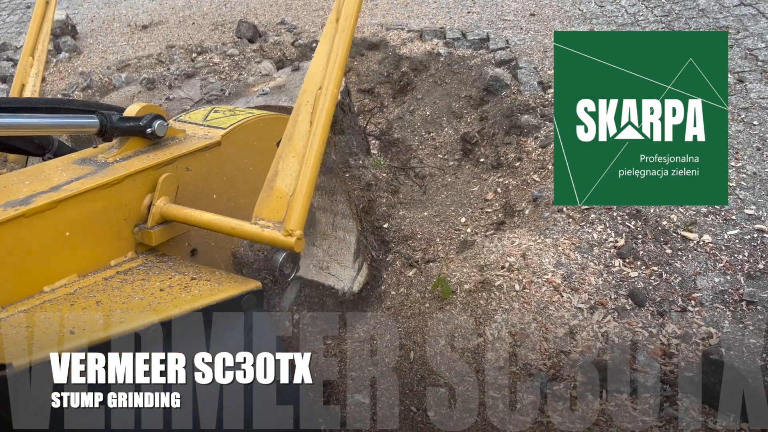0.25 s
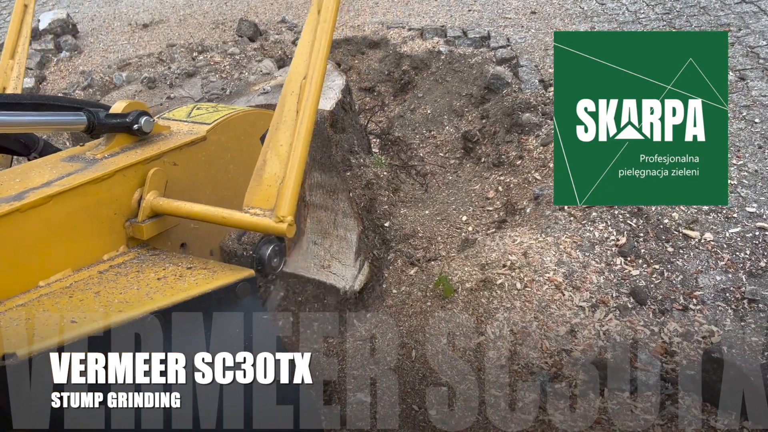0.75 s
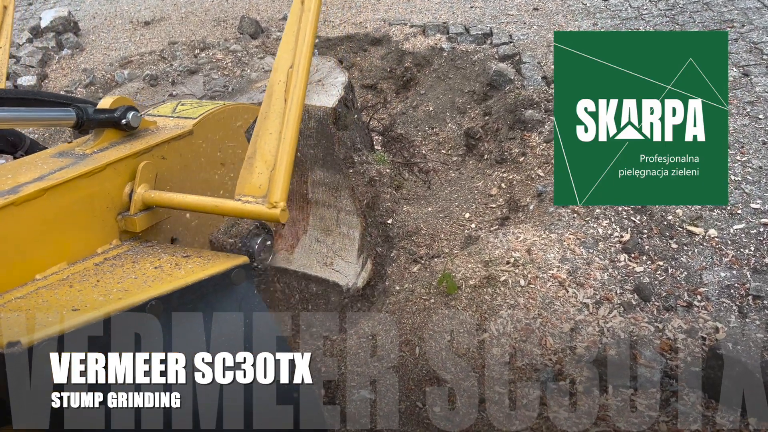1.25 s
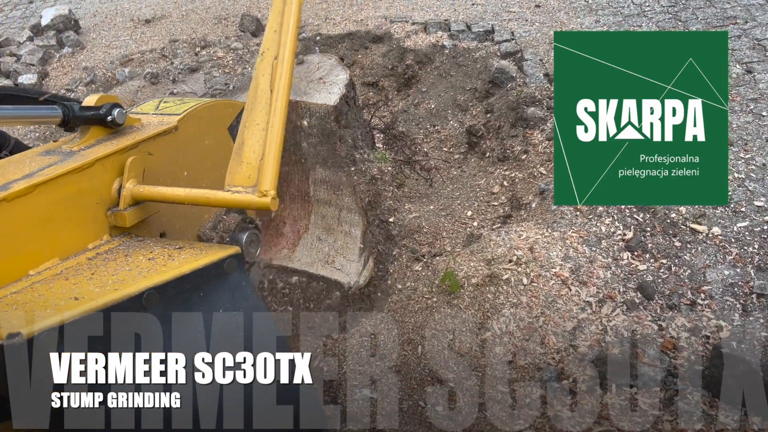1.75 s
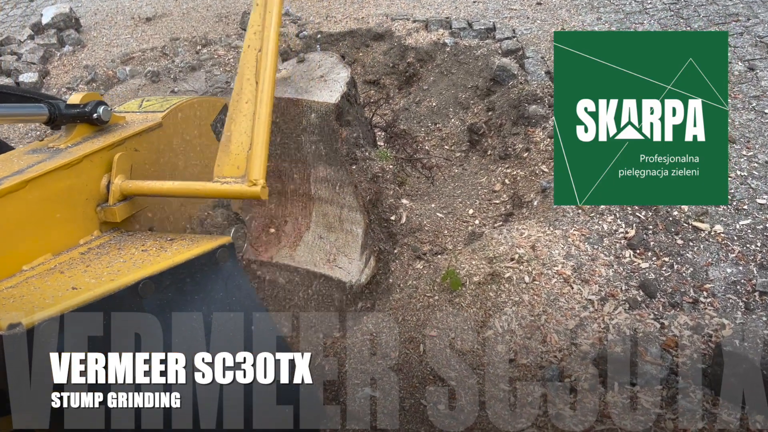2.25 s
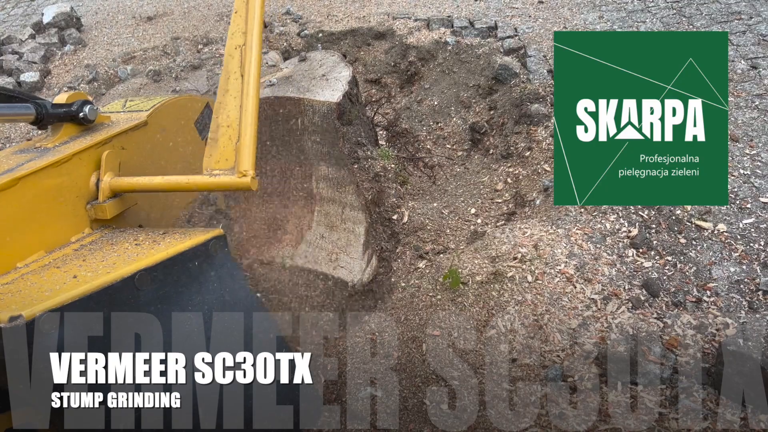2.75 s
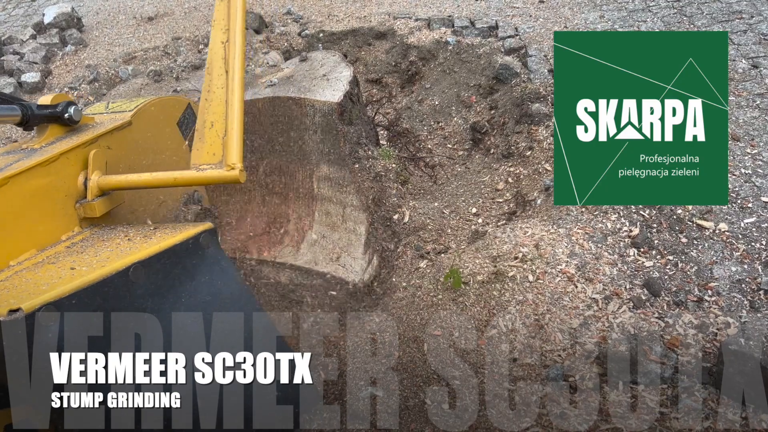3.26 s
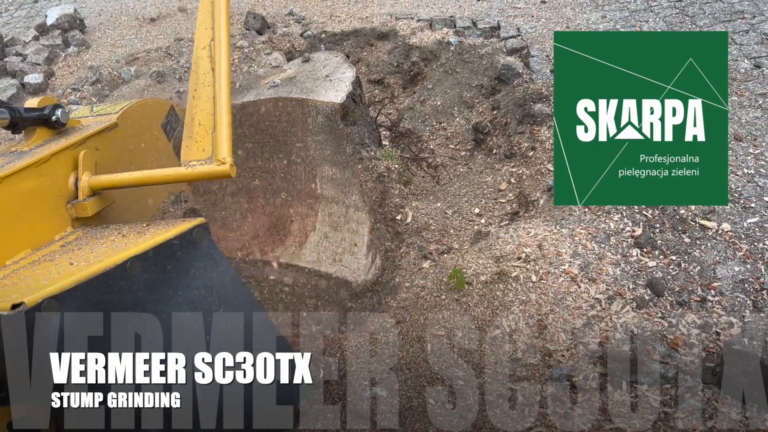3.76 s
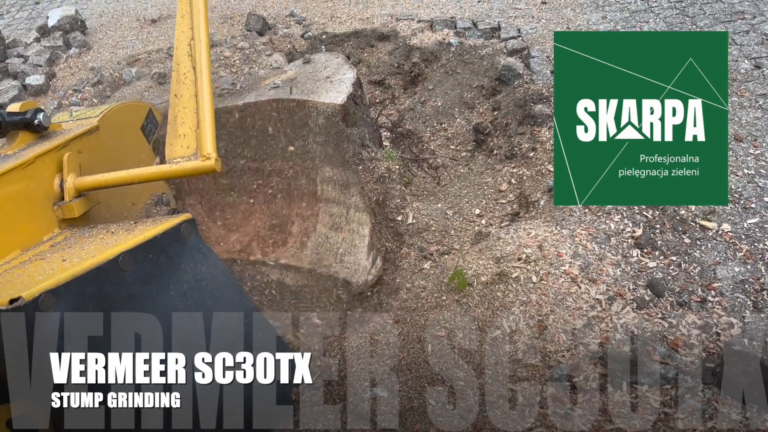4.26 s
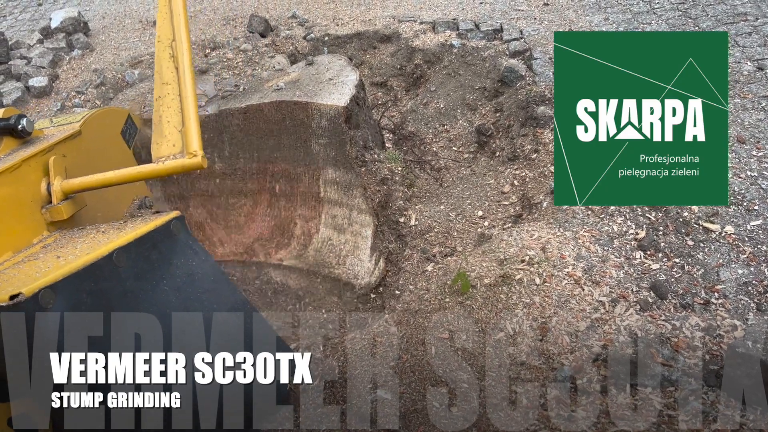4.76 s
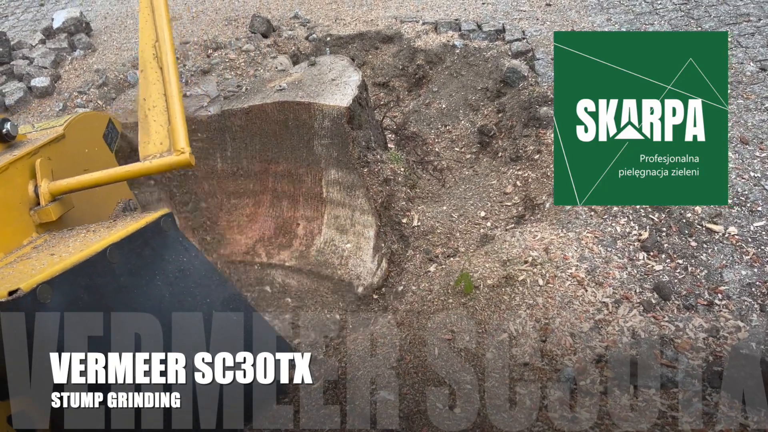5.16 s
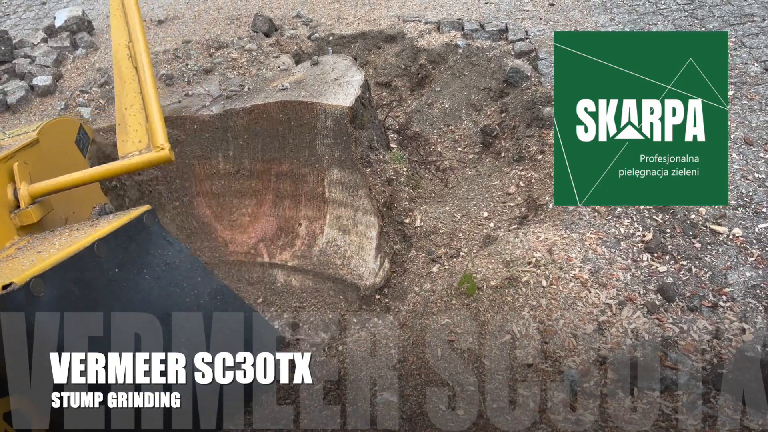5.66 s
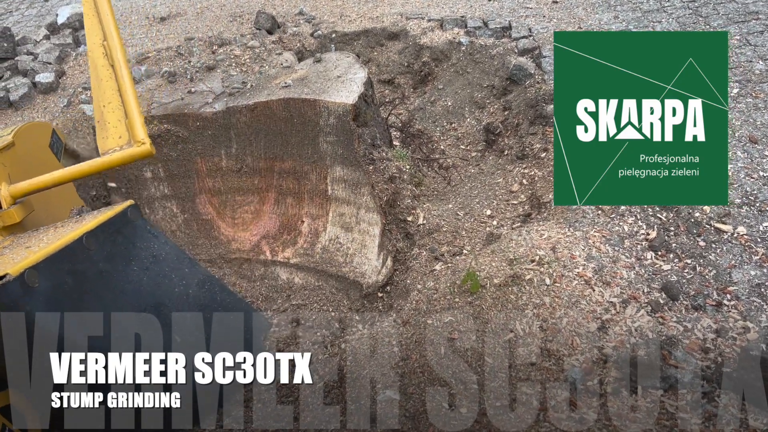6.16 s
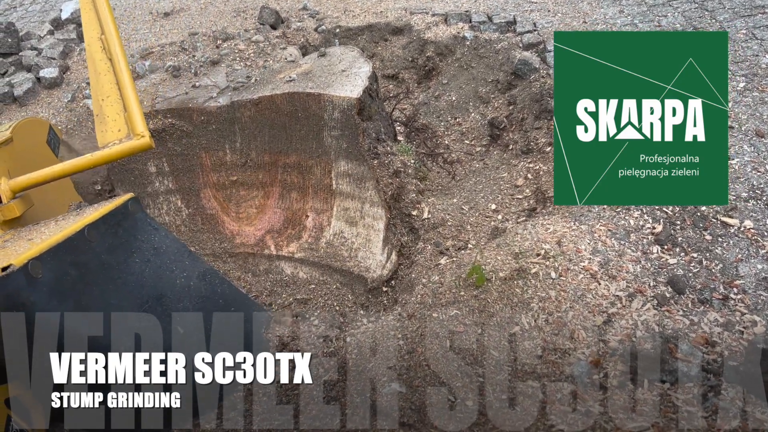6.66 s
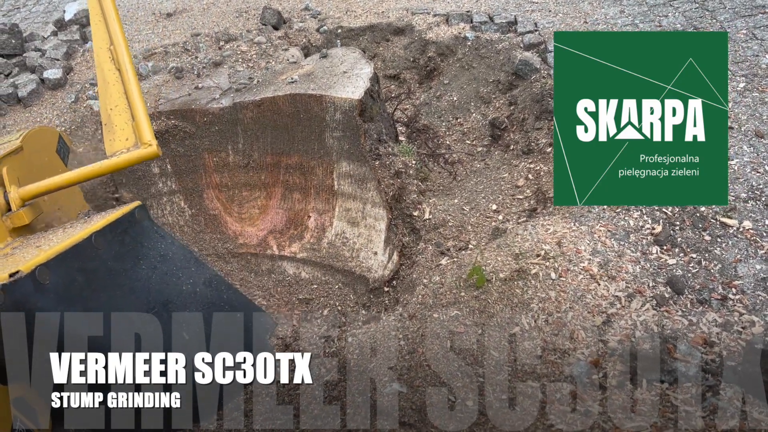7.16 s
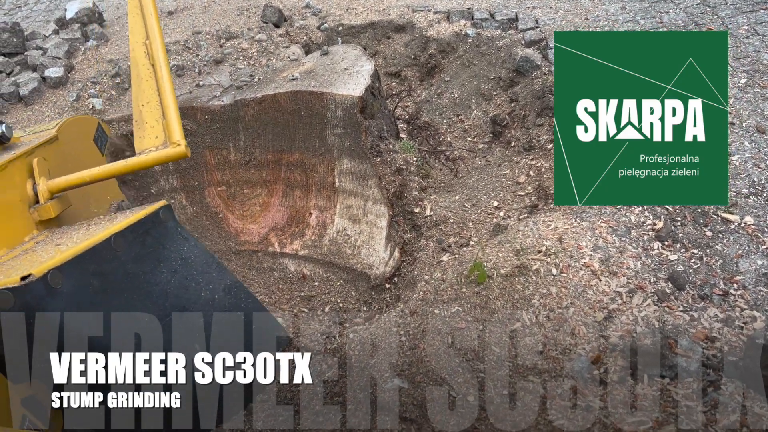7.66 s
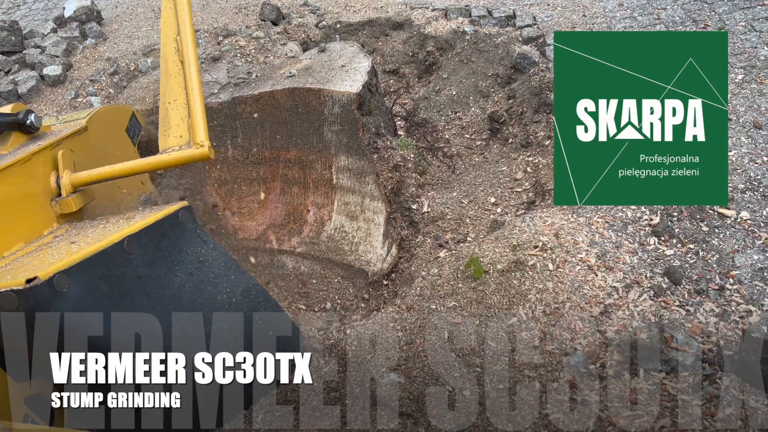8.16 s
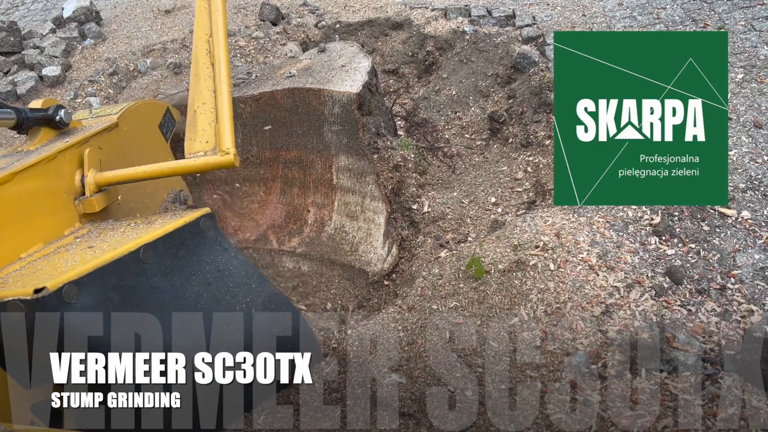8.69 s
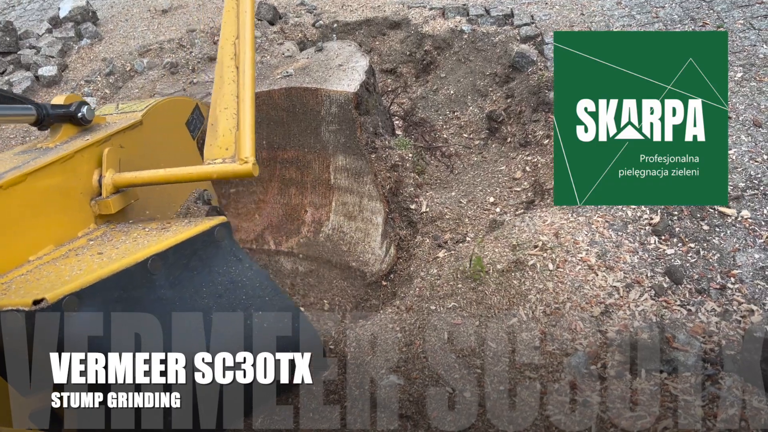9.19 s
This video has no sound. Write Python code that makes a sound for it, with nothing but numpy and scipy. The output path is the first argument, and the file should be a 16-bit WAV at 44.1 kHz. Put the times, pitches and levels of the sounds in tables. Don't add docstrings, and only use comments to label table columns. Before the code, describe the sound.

Close by, a loaded twin-cylinder engine drones and whines while cutting teeth roar into a stump, loose metal clatters and chips tick against guards.

```python
import sys
import numpy as np
from scipy import signal
from scipy.fft import rfft, irfft, next_fast_len
from scipy.io import wavfile
from scipy.ndimage import uniform_filter1d

SR = 44100
rng = np.random.default_rng(int(sys.argv[2]) if len(sys.argv) > 2 else 0)


def elevation(decibels):
    levels = np.asarray(decibels, float)
    return 10 ** (levels / 20)


def persist_wave(psi):
    counts = np.round(np.clip(psi, -1, 1) * 32767).astype(np.int16)
    wavfile.write(sys.argv[1], SR, np.atleast_2d(counts).T)


N = 415863
T = np.arange(N) / SR


def unit(x):
    return x / np.sqrt(np.mean(x ** 2))


def noise():
    return rng.standard_normal(N)


def curve(table):
    return np.interp(T, *np.transpose(table))


def pitch_curve(hz, table):
    at, value = np.transpose(table)
    return np.interp(np.log(hz), np.log(at), value)


def ring(x, hz, width):
    return signal.lfilter(*signal.iirpeak(hz, hz / width, SR), x)


def broad(x, hz, width):
    return ring(ring(x, hz, width), hz, width)


def body(x, modes):
    return sum(elevation(db) * ring(x, hz, width) for hz, width, db in modes)


def walk(rate):
    levels = rng.standard_normal(int(N / SR * rate) + 4)
    eighths = np.arange(0, len(levels), 1 / 8)
    fine = uniform_filter1d(np.interp(eighths, np.arange(len(levels)), levels), size=8)
    return 1.4 * np.interp(T * rate * 8, np.arange(len(fine)), fine)


def spell(start, end, fade):
    return np.clip(np.minimum(T - start, end - T) / fade + 1, 0, 1) ** 2


def strikes(turns, jitter_ms, scatter_db):
    at = np.flatnonzero(np.diff(np.floor(turns)) > 0)
    chance = rng.standard_normal((len(at), 2))
    shift = (chance[:, 0] * jitter_ms * SR / 1000).astype(int)
    out = np.zeros(N)
    out[np.clip(at + shift, 0, N - 1)] = elevation(scatter_db * chance[:, 1])
    return out


# (frequency [Hz], phase [rad])
PORT_LAG = [(0, 0), (200, .9), (700, 2), (1600, 3.3), (2200, 6.1), (3900, 9.2), (4600, 13.3), (7000, 18.8),
            (8600, 17.4), (9100, 15.7), (10800, 15.7), (12500, 12.6), (14700, 12.4), (15400, 9.7)]
# (frequency [Hz], level [dB])
PORT_DB = [(60, 1), (135, 2), (165, -.5), (220, 9), (300, 4), (360, 2.5), (700, 5.5), (1200, 3), (1900, 0),
           (3300, 3.5), (5600, 7), (7300, 1.5), (10000, 0)]
# (frequency [Hz], share [0-1])
PORT_ALIKE = [(60, .99), (250, .9), (380, .45), (600, .8), (1500, .75), (2800, .6), (4000, .2), (6500, .15),
              (8500, .5), (9200, .86), (10600, .9), (11600, .6), (12700, .93), (15200, .6)]


def ports(x, alike=None):
    size = next_fast_len(N)
    hz = np.maximum(np.arange(size // 2 + 1) * SR / size, 1)
    right = rfft(x, size)
    if alike is not None:
        share = np.clip(pitch_curve(hz, PORT_ALIKE), 0, 1)
        right = share * right + np.sqrt(1 - share ** 2) * rfft(alike, size)
    lag = np.interp(hz, *np.transpose(PORT_LAG))
    right = right * elevation(-pitch_curve(hz, PORT_DB)) * np.exp(-1j * lag)
    return np.array([x, irfft(right, size)[:N]])


# (frequency [Hz], width [Hz], level [dB], pipe lag [ms])
SILENCER = [(74, 18, -3.8, 3.35), (139, 40, 0, .15), (222.7, 39.4, -3.2, 1.31), (280, 15, -9, .93),
            (740, 200, -17, 0)]
FIRING_TURNS = (.3, .66)
CRANK_TURNS, VALVE_TURNS = .445, .37


def engine(cycle, effort_db):
    firings = sum(elevation(db) * strikes(cycle - turn, .08, .9) for turn, db in zip(FIRING_TURNS, (0, 1.3)))
    push = -signal.lfilter(np.hanning(30), 1, firings)
    chambers = []
    for hz, width, db, lag_ms in SILENCER:
        chambers.append(elevation(db) * np.roll(ring(push, hz, width), round(lag_ms * SR / 1000)))
    load = np.minimum(effort_db - np.median(effort_db), 0)
    deep = sum(chambers[:2]) * elevation(1.1 * load)
    exhaust = ring(deep + sum(chambers[2:]), 190, 420)
    crank = np.sqrt(2) * np.cos(4 * np.pi * (cycle - CRANK_TURNS)) * elevation(-29.3 + .3 * walk(5))
    rocking = np.cos(2 * np.pi * (cycle - .16)) * elevation(-52)
    valve_turns = 2 * (cycle - VALVE_TURNS)
    clacks = strikes(valve_turns, .03, 1.5) + .45 * strikes(valve_turns - .5, .03, 1.5)
    valves = broad(clacks, 1000, 1300)
    return unit(exhaust) * elevation(effort_db + 1.5) + crank + rocking + unit(valves) * elevation(-41.5)


PUMP_TEETH = 11
# (multiple of tooth rate, floor [dB], swell [dB], resonant speed [rpm], width [rpm])
PUMP_LINES = [(3, -56, 12, 3440, 70), (4, -56, 11, 3322, 34), (8, -60, 10, 3440, 110),
              (13, -49.5, -5.5, 3310, 60), (18, -62, 10, 3330, 130), (6, -58, 0, 3300, 99)]


def pump(cycle, rpm):
    tremble = np.cumsum(walk(40)) * 2 * np.pi * 1.5 / SR
    tooth = 2 * np.pi * 2 * PUMP_TEETH * cycle + tremble
    whine = elevation(-39.5) * np.sin(tooth) + elevation(-44) * np.sin(2 * tooth)
    levels = [db + swell_db * np.exp(-((rpm - at) / width) ** 2) for _, db, swell_db, at, width in PUMP_LINES]
    for (multiple, *_), db in zip(PUMP_LINES, levels):
        line_db = db + 9 - multiple / 6 + 2.5 * walk(12)
        whine = whine + elevation(line_db) * np.sin(multiple * tooth)
    blades = np.sin(2 * np.pi * 72 * cycle)
    return whine + blades * elevation(levels[1] + 4 + 2 * walk(4))


# (frequency [Hz], level per hertz [dB])
ROAR = [(40, -67), (100, -63), (260, -59), (500, -61), (650, -55), (1100, -55.5), (1550, -60),
        (2700, -64.8), (3900, -69), (5000, -69.5), (7000, -74), (8200, -73), (10000, -78), (15500, -81.5)]


def roar(cycle, effort_db, roar_db, hiss_db):
    throb = 0.87 * np.cos(2 * np.pi * (cycle - .33)) + 1.2 * np.cos(4 * np.pi * (cycle - .35))
    load, low, high = (c - c.mean() for c in (effort_db, roar_db, hiss_db))
    high = high + 0.67 * throb + .5 * walk(15)
    pair = np.zeros((2, N))
    for hz in 25 * 2 ** np.arange(0, 9.5, .4):
        bass = np.clip(np.log2(400 / hz), 0, 1) * (hz > 70)
        treble = np.clip(np.log2(hz / 1200) / 1.5, 0, 1)
        db = pitch_curve(hz, ROAR) + 10 * np.log10(hz * 0.28)
        db = db + bass * .5 * load + (1 - bass - treble) * low + treble * high + .7 * walk(14)
        edges = (hz * 2 ** -.2, hz * 2 ** .2)
        bandpass = signal.butter(2, edges, "bandpass", fs=SR, output="sos")
        band = signal.sosfilt(bandpass, rng.standard_normal((2, N)))
        pair += band * (elevation(db + 1.57) / band.std())
    return ports(pair[0], alike=pair[1])


# (frequency [Hz], width [Hz], level [dB])
PANELS = [(608, 22, -42), (858, 26, -37), (1645, 18, -42), (2209, 30, -39), (3081, 30, -50),
          (3300, 40, -53)]
# (frequency [Hz], width [Hz])
GUARDS = [(360, 40), (1045, 30), (5750, 14), (6350, 20), (8312, 20)]
GUARD_REST_DB = (-48, -46.5, -50, -58, -83)
# (guard index, start [s], end [s], level [dB])
SINGING = [
    (0, -1, 4.6, -40),
    (0, 8.6, 10, -42),
    (2, 0, 3.0, -55),
    (2, 3.0, 5.7, -51),
    (2, 5.8, 7.7, -55),
    (3, 5.3, 6.0, -57),
    (4, 3.2, 5.4, -52),
]
GUARD_FADE_S, FREE_GUARD_DB = 0.42, -39


def guards(free):
    steady = sum(unit(ring(noise(), hz, width)) * elevation(db + 2.5 * walk(1.5)) for hz, width, db in PANELS)
    gains = [elevation(db) + np.zeros(N) for db in GUARD_REST_DB]
    for guard, start, end, db in SINGING:
        gains[guard] += elevation(db) * spell(start, end, GUARD_FADE_S)
    gains[1] += free * elevation(FREE_GUARD_DB)
    notes = [unit(ring(noise(), hz, width)) * gain * elevation(4) for (hz, width), gain in zip(GUARDS, gains)]
    ahead = sum(notes[:2]) * elevation([[-3], [-4.5]])
    return ports(steady + sum(notes[2:])) + ahead


# (frequency [Hz], width [Hz], level [dB])
PLATE = [(2209, 26, 0), (2168, 40, -6), (2120, 70, -15), (2370, 90, -16)]
# (time [s], level [dB])
RATTLE = [(0.0, -31), (0.37, -36), (0.52, -29), (1.02, -33.5), (1.15, -27), (1.73, -38), (1.94, -30),
          (2.31, -39.5), (2.41, -25), (2.47, -34.5), (3.89, -32.5), (5.8, -30.5), (6.01, -35),
          (8.06, -33.5), (9.14, -28.5), (9.43, -33.5)]
# (time [s], peak level [dB])
KNOCKS = [(0.0837, -18), (0.156, -17.5), (0.3401, -20), (0.7407, -16.5), (0.8131, -15.5), (1.1034, -17.5),
          (1.3563, -16), (1.931, -19), (1.9699, -19), (2.4029, -15.5), (2.8729, -19.5), (3.2375, -17),
          (3.3837, -16.5), (4.339, -19.5), (4.4872, -18), (4.5615, -20), (4.5979, -18.5), (4.8214, -23),
          (4.8589, -19), (5.0444, -17), (5.7024, -17), (5.8441, -20), (6.2282, -19), (6.4378, -18),
          (8.2935, -16), (8.3674, -17.5), (8.6627, -16), (8.8099, -14.5), (8.957, -17), (9.213, -16)]
PLATE_TURNS = .24


def plate(cycle):
    knock = strikes(cycle - PLATE_TURNS, .6, 2.4) * elevation(10.5 + curve(RATTLE))
    at = np.flatnonzero(knock)
    for s, db in KNOCKS:
        knock[at[np.argmin(abs(at - s * SR))]] = 0
        knock[int(s * SR)] = elevation(db + 2.0)
    period = SR / PLATE[0][0]
    bounce = .8 * np.roll(knock, round(4 * period)) + .5 * np.roll(knock, round(9 * period))
    late = elevation(-29) * strikes(cycle - PLATE_TURNS - .4, 2.5, 4)
    peak = abs(body(signal.unit_impulse(SR), PLATE)).max()
    return body(knock + bounce + late, PLATE) / peak * elevation(-2.5)


# (time [s], peak level [dB], ring frequency [Hz], crack level [dB])
CHIPS = [(0.387, -22, 5360, -17), (0.5187, -16, 5300, -19), (1.065, -17, 5240, -30),
         (1.4411, -29, 4930, -11), (1.71, -17, 4920, -25), (1.8642, -31, 7180, -14),
         (2.2932, -38, 5770, -29), (2.4947, -27, 7480, -6), (2.573, -13.5, 4280, -26),
         (2.6199, -28, 4950, -19), (3.0345, -18.5, 4640, -20), (3.5074, -29, 4520, -11),
         (3.5997, -26, 4510, -19), (4.4483, -32, 5750, -8), (4.574, -30, 7220, -12),
         (4.7037, -20, 5260, -20), (4.9276, -25, 4430, -14), (5.3817, -29, 5740, -15),
         (5.4136, -34, 4210, -14), (5.9495, -12.5, 5800, -26), (6.3033, -20, 5000, -17),
         (7.0544, -21, 4440, -27), (7.112, -16, 4930, -34), (7.419, -17, 5370, -17),
         (9.227, -19, 4740, -17), (9.3606, -30, 4690, -15), (9.416, -18.5, 4450, -20)]


def chips():
    out = np.zeros(N + SR)
    s = np.arange(int(.03 * SR)) / SR
    envelope = (1 - np.exp(-s / .0005)) * np.exp(-s / .0045)
    small = []
    for when, size, pitch in rng.random((250, 3)):
        small.append((when * N / SR, -36 + 3.5 * -np.log(size + .03), 3000 * 2 ** (1.1 * pitch), -14))
    for at, db, hz, crack_db in list(CHIPS) + small:
        burst = rng.standard_normal(len(s)) * envelope
        ping = ring(burst, hz, hz * .1)
        crack = broad(burst, 5800, 7000)
        hit = ping / abs(ping).max() + elevation(crack_db + 18.0) * crack / abs(crack).max()
        i = int(at * SR)
        out[i:i + len(s)] += elevation(db + 2.0) * hit
    return out[:N]


# (start [s], end [s], level [dB])
THUDS = [
    (2.9, 3.0, -40),
    (3.25, 3.75, -45),
    (4.15, 4.55, -37),
    (4.65, 5.103, -39),
    (5.35, 5.41, -32),
    (8.5, 9.5, -48),
]
THUD_FADE_S, THUD_REST_DB = 0.058, -52


def thuds():
    gain = elevation(THUD_REST_DB) + sum(elevation(db) * spell(start, end, THUD_FADE_S) for start, end, db in THUDS)
    surge = elevation(np.clip(4 * walk(14), -12, 5))
    return unit(broad(noise(), 78, 70) * surge) * gain * elevation(1)


# (time [s], speed [rpm])
SHAFT = [(0.0, 3260.2), (0.47, 3294.7), (1.64, 3334.4), (2.47, 3316.9), (4.15, 3255.0), (4.86, 3210.0),
         (4.97, 3244.5), (5.53, 3283.7), (5.74, 3385.8), (6.11, 3456.2), (6.28, 3449.2), (6.64, 3320.9),
         (6.82, 3443.3), (7.48, 3425.0), (8.22, 3225.6), (8.62, 3223.0), (8.83, 3266.3), (9.43, 3294.2)]
# (time [s], level [dB])
BITE = [(0, 2), (.9, 3), (1.7, 2.5), (2.5, 3.5), (3.2, 1.5), (4.7, 1), (5.8, 2.5), (6.6, 0.5), (7.05, 3),
        (7.7, 1), (8.6, 2), (9.2, 3.5), (9.43, 4.5)]
LOADED_RPM, EASING_RPM, FREE_RPM = 3230, 3335, 3430
EXHAUST_DB, DROOP_DB_PER_100_RPM, FREE_EXHAUST_DB = -24, -1.45, -4.5
FREE_ROAR_DB, ROAR_PER_BITE = 1.5, 0.31


def scene():
    rpm, bite_db = curve(SHAFT), curve(BITE)
    cycle = np.cumsum(rpm / 120) / SR
    free = np.clip((rpm - EASING_RPM) / (FREE_RPM - EASING_RPM), 0, 1)
    droop_db = DROOP_DB_PER_100_RPM * (rpm - LOADED_RPM) / 100
    effort_db = EXHAUST_DB + droop_db * (1 - free) + FREE_EXHAUST_DB * free
    near = engine(cycle, effort_db) + pump(cycle, rpm) + plate(cycle) + thuds()
    air = roar(cycle, effort_db, ROAR_PER_BITE * bite_db + FREE_ROAR_DB * free, bite_db)
    grit = chips()
    return ports(near) + air + guards(free) + ports(grit, alike=np.roll(grit, 40))


def roll_off(x):
    return signal.sosfilt(signal.butter(12, 16330, fs=SR, output="sos"), x)


def record(dry):
    mix = signal.sosfilt(signal.butter(2, 22, "highpass", fs=SR, output="sos"), dry)
    mix = np.tanh(.8 * mix) / .8
    mix = signal.sosfilt(signal.ellip(10, .2, 80, 15720, fs=SR, output="sos"), mix)
    return roll_off(mix)


dry = scene()
out = record(dry)
persist_wave(out)
```